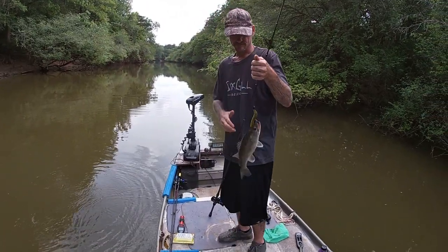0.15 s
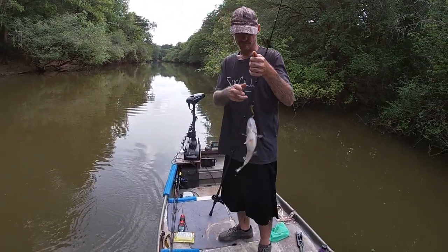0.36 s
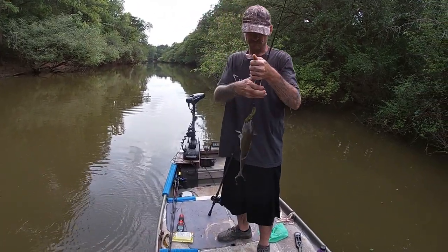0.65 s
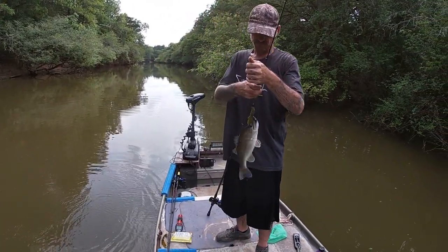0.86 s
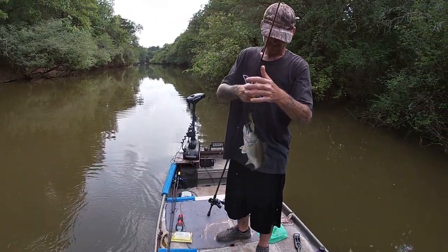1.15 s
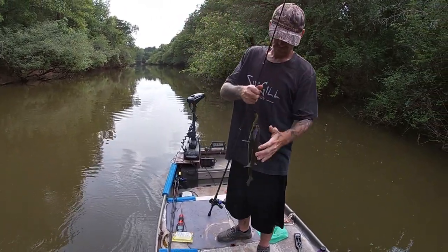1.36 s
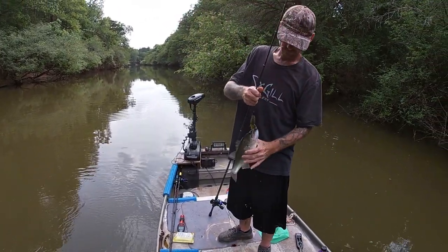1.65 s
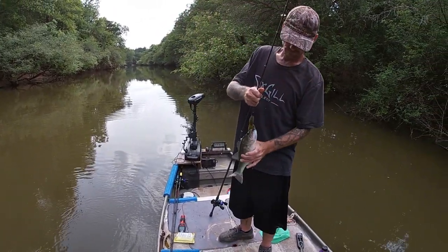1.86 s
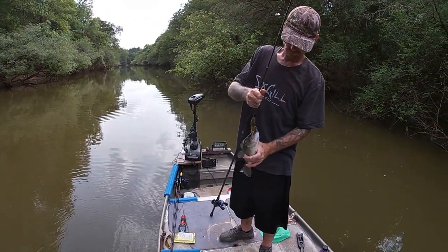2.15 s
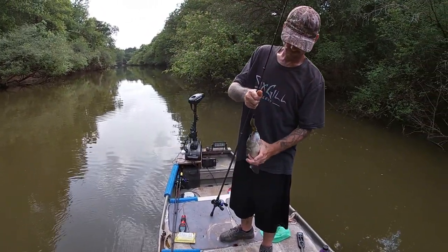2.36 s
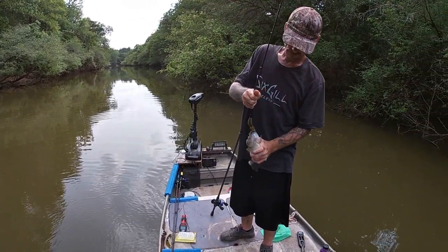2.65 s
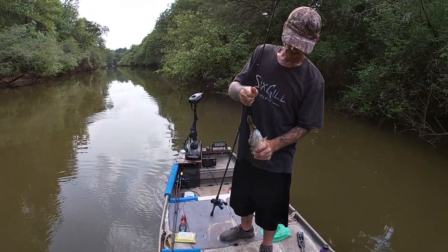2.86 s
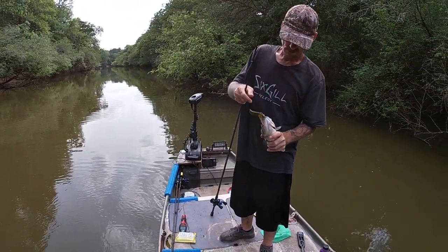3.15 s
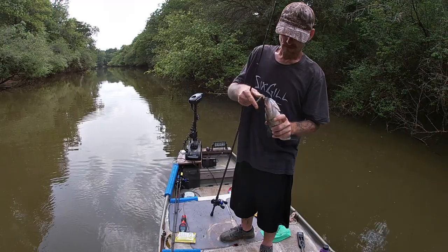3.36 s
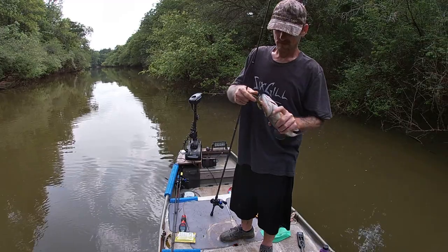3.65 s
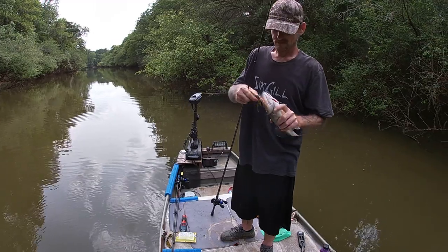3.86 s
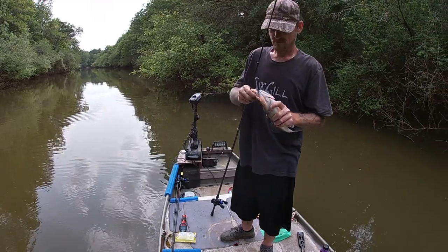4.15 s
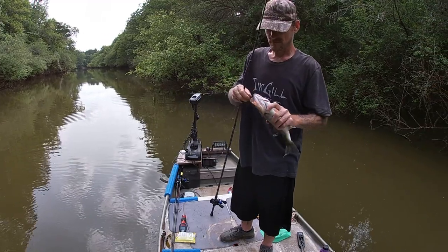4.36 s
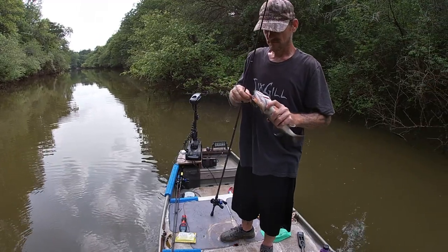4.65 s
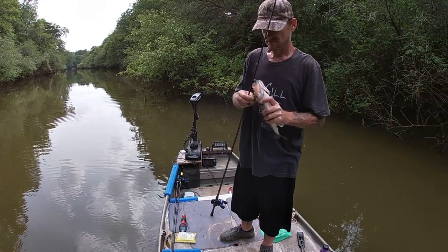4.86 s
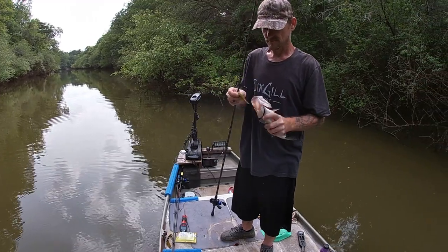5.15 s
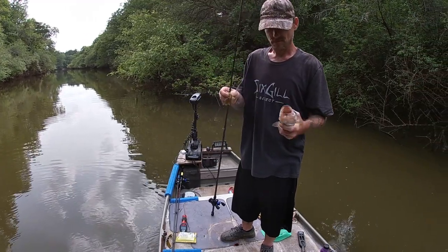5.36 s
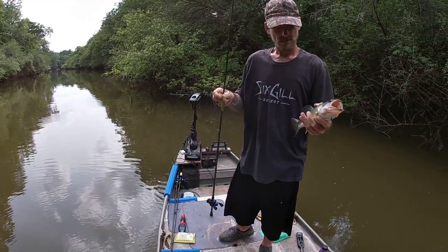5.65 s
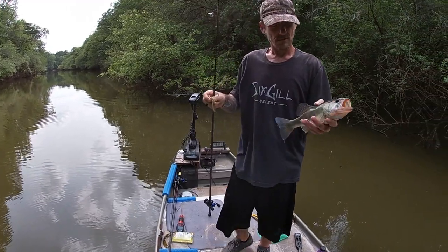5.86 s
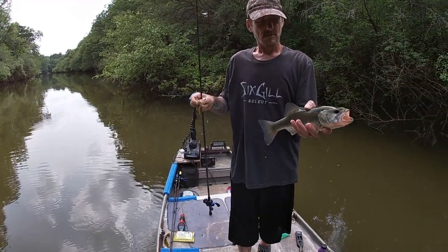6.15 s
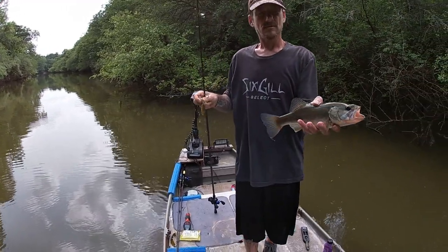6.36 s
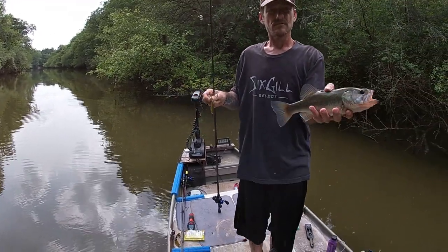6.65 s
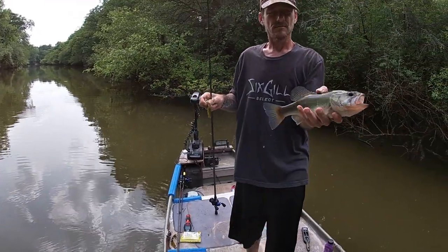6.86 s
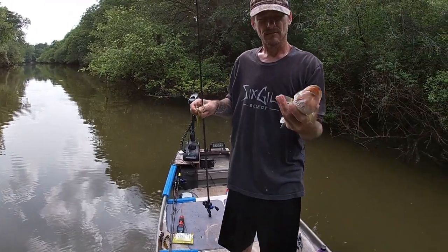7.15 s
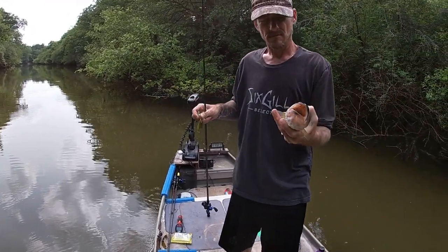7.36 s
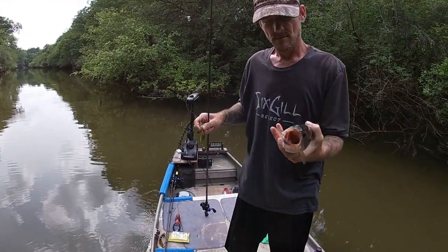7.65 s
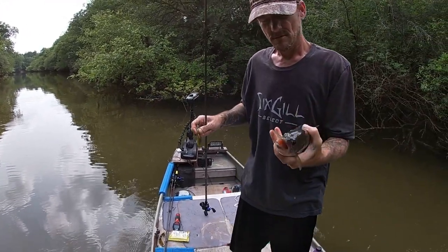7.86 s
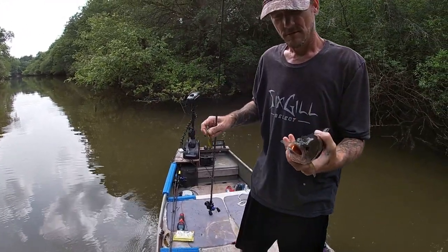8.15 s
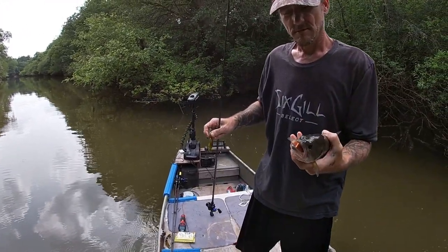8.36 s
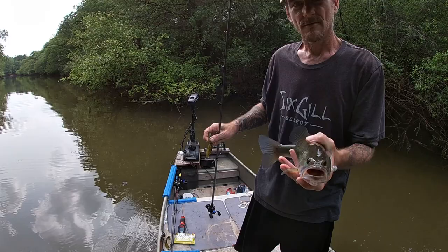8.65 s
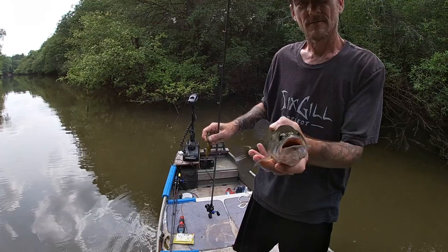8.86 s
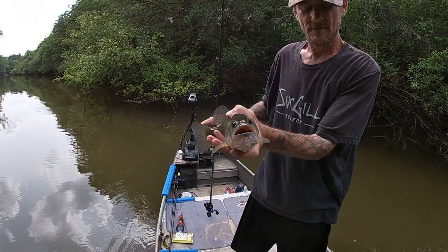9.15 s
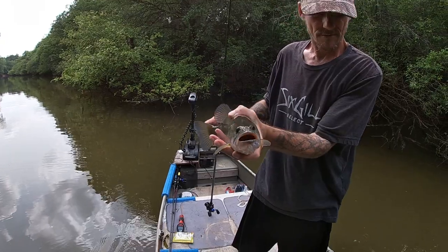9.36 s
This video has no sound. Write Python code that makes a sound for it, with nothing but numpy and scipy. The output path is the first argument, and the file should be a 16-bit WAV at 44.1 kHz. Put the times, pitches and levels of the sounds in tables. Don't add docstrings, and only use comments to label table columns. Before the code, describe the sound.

Outdoors on a small metal boat, the microphone catches handling sounds close by under constant shrill cicadas. A burst of hollow thuds and clinks comes first, then a bright, bird-like fluttering whistle echoing in the trees. After a calmer spell, small metallic clinks and line snaps cluster, followed by knocks and booming footfalls on the hull. Faint distant bird whistles, low water murmur and light wind puffs continue around them.

```python
import sys
import numpy as np
from scipy import signal
from scipy.fft import rfft, irfft
from scipy.io import wavfile
from scipy.ndimage import uniform_filter1d

SR = 44100
rng = np.random.default_rng(int(sys.argv[2]) if len(sys.argv) > 2 else 0)


def linear_from_db(decibels):
    return 10 ** (np.asarray(decibels, float) / 20)


def dump_mix(stems):
    frames = np.atleast_2d(stems).T
    limited = np.clip(frames, -1, 1)
    pcm = np.round(limited * 32767).astype(np.int16)
    wavfile.write(sys.argv[1], SR, pcm)


N = 419832


def in_time(rows):
    s, *columns = np.transpose(rows)
    return [np.interp(np.arange(N) / SR, s, column) for column in columns]


def rms_one(x):
    return x / np.sqrt(np.mean(x ** 2) + 1e-20)


def noise():
    return rng.standard_normal(N)


def band(x, low_hz, high_hz):
    return signal.sosfilt(signal.butter(2, [low_hz, high_hz], "band", fs=SR, output="sos"), x)


def colour(x, points):
    hz, db = np.transpose(points)
    log_hz = np.log(np.arange(N // 2 + 1) * SR / N + 1)
    gain_db = np.interp(log_hz, np.log(hz), db, left=-90, right=-90)
    return rms_one(irfft(rfft(x) * linear_from_db(gain_db), N))


def drift(rate_hz):
    r = np.exp(-80 * np.pi * rate_hz / SR)
    slow = signal.lfilter([1], [1, -2 * r, r * r], rng.standard_normal(N // 40 + 2002))[2000:]
    return np.interp(np.arange(N) / 40, np.arange(len(slow)), rms_one(slow))


def ring(push, hz, t60_s):
    r, w = linear_from_db(-60 / (t60_s * SR)), 2 * np.pi * hz / SR
    return signal.lfilter([0, np.sin(w)], [1, -2 * r * np.cos(w), r * r], push + 1e-18)


def add(out, s, sound):
    at = round(s * SR)
    out[at:at + len(sound)] += sound[:N - at]


def woods(x, t60_s):
    t = np.arange(SR) / SR
    tail = rng.standard_normal(SR) * linear_from_db(-60 * t / t60_s)
    tail *= 1 - np.exp(-t / 0.0073)
    return signal.fftconvolve(x, tail / np.sqrt(np.sum(tail ** 2)))[:N]


def hush():
    # pitch_hz, level_db (per Hz)
    hush_points = [(300, -36), (560, -5), (800, 3.5), (1000, -4), (1400, -1), (2000, -6), (2800, -22),
                   (4000, -32)]
    steady = colour(noise(), hush_points)
    low = signal.sosfiltfilt(signal.butter(2, 1200, fs=SR, output="sos"), steady)
    high = steady - low
    return linear_from_db(-74) * (low * linear_from_db(1.7 * drift(4.5)) + high * linear_from_db(2.1 * drift(2.7)))


def murmur():
    # time_s, level_db
    stir_curve = [(0, -63.5), (.4, -64), (.53, -44.5), (.74, -68), (1.14, -63), (1.4, -64.5), (3.9, -64.5),
                  (4.5, -65.5), (4.98, -64.5), (5.43, -65), (6.0, -59), (6.31, -54), (6.5, -63),
                  (7.21, -60.5), (7.82, -60), (8.6, -63.5), (8.83, -59.5), (9.52, -62.5)]
    # pitch_hz, level_db (per Hz)
    murmur_points = [(70, -7), (100, -8.5), (180, 3), (220, -2.5), (290, -10.5), (420, -13), (600, -22),
                     (1000, -25.5)]
    level_db, = in_time(stir_curve)
    return colour(noise() * linear_from_db(1.97 * drift(17.5)), murmur_points) * linear_from_db(level_db)


def wind():
    # peak_s, length_s, level_db
    puffs = [(0, 0.43, -58.5), (0.29, 0.31, -56.5), (0.772, 0.56, -53.5), (1.07, 0.35, -56.5),
             (1.593, 0.73, -61), (2.48, 1, -61), (3.183, 0.61, -58), (3.595, 0.87, -68), (4.11, 0.99, -63),
             (6.286, 0.18, -50), (6.722, 0.34, -52), (6.94, 0.29, -63), (7.393, 0.73, -49.5),
             (7.848, 0.43, -65), (8.32, 0.6, -64), (8.8, 0.35, -60), (9.177, 0.48, -62),
             (9.52, 0.35, -52.5)]
    # pitch_hz, level_db (per Hz)
    wind_points = [(18, -20), (32, 0.5), (50, -2), (70, -3.5), (100, -11.5), (160, -9), (300, -31)]
    t = np.arange(N) / SR
    strength = linear_from_db(-73.5) * np.ones(N)
    for peak_s, length_s, db in puffs:
        strength += linear_from_db(db) * np.exp(-(3 * (t - peak_s) / length_s) ** 2)
    return colour(noise(), wind_points) * strength * linear_from_db(1.5 * drift(6))


def far_song():
    # peak_s, level_db
    song_peaks = [(0, -68), (1.62, -60), (2.46, -66.5), (3.23, -62), (4.6, -57.5), (6.23, -72), (7.98, -59),
                  (8.52, -77), (8.75, -64)]
    rise_db_per_s, fall_db_per_s = 65, 36
    whistles, t = np.zeros(N), np.arange(SR // 25) / SR
    for s, pitch, glide in rng.random((1800, 3)):
        hz = 2500 + 800 * pitch + 40000 * (glide - .5) * (t - .02)
        add(whistles, s * N / SR, np.sin(2 * np.pi * np.cumsum(hz) / SR) * np.hanning(len(t)))
    time = np.arange(N) / SR
    strength = linear_from_db(-81) * np.ones(N)
    for peak_s, db in song_peaks:
        slope = np.where(time < peak_s, rise_db_per_s, fall_db_per_s)
        strength += linear_from_db(db - slope * abs(time - peak_s))
    return rms_one(woods(whistles, 0.42)) * strength * linear_from_db(-3.0)


def whistle(notes, second_db, third_db):
    out = np.zeros(N)
    for note in notes:
        s, hz, db = np.transpose(note)
        t = np.arange(s[0], s[-1], 1 / SR)
        glide_hz = uniform_filter1d(np.interp(t, s, hz), size=130)
        turn = 2 * np.pi * np.cumsum(glide_hz) / SR
        level_db = np.interp(t, s, db)
        overtone_gain = linear_from_db(.6 * (level_db + 32))
        overtones = linear_from_db(second_db) * np.sin(2 * turn) + linear_from_db(third_db) * np.sin(3 * turn)
        tone = np.sqrt(2) * (np.sin(turn) + overtone_gain * overtones)
        add(out, s[0], tone * linear_from_db(level_db) * signal.windows.tukey(len(t), .1))
    return out


def far_birds():
    # start_s, length_s, from_hz, to_hz, level_db
    far_calls = [(1.453, .055, 2480, 2340, -66), (1.523, 0.044, 2660, 2740, -62),
                 (1.566, .034, 2750, 3130, -53.5), (1.59, .025, 3080, 3550, -55),
                 (1.74, 0.033, 3150, 3250, -58), (1.704, 0.028, 3240, 3250, -53),
                 (2.8, .1, 2610, 2560, -67), (2.947, 0.18, 2550, 2540, -70), (2.887, .07, 2380, 2340, -72),
                 (3.223, .1, 2620, 2560, -68), (3.28, .14, 2334, 2320, -74), (3.8, .12, 2600, 2690, -72),
                 (6.295, 0.079, 2600, 2600, -70), (6.71, 0.076, 2630, 2610, -70),
                 (4.448, 0.037, 2760, 2220, -60), (4.476, 0.02, 2280, 2620, -58),
                 (4.495, 0.036, 2620, 2300, -59), (4.553, .02, 3230, 2780, -53),
                 (4.57, .04, 2800, 2800, -61), (4.575, 0.11, 2500, 2330, -61.5),
                 (4.67, 0.067, 2200, 1930, -68), (7.787, 0.029, 3190, 2800, -50.5),
                 (7.817, 0.037, 2910, 3180, -51), (7.847, .025, 2830, 2350, -58),
                 (7.946, 0.16, 2610, 2720, -67), (8.315, .05, 770, 740, -63), (8.387, .06, 724, 720, -68),
                 (8.0, 0.044, 1280, 1250, -70), (8.491, .04, 2860, 2710, -65),
                 (8.673, 0.031, 2870, 2720, -58), (8.713, 0.034, 2820, 2370, -61)]
    shape = (0, -8), (.18, 0), (.65, 0), (1, -14)
    notes = []
    for s, length_s, from_hz, to_hz, db in far_calls:
        notes.append([(s + k * length_s, from_hz + k * (to_hz - from_hz), db + g) for k, g in shape])
    far = whistle(notes, -42, -50)
    return .6 * far * linear_from_db(2 * drift(50) + 3 * drift(150)) + linear_from_db(-10) * woods(far, .4)


def far_dove():
    # time_s, pitch_hz, level_db
    coo_notes = [
        [(8.815, 735, -80), (8.84, 740, -68), (8.9, 708, -66.5), (9.0, 702, -63), (9.04, 734, -68),
         (9.09, 715, -80)],
    ]
    return whistle(coo_notes, -40, -60) * linear_from_db(1.5 * drift(30))


def near_bird():
    # time_s, pitch_hz, level_db
    phrase = [
        [(2.275, 2003, -82), (2.29, 2720, -48), (2.299, 3850, -39), (2.315, 4550, -36), (2.328, 4780, -33.5),
         (2.342, 4400, -34), (2.355, 3200, -38.5), (2.364, 2880, -44)],
        [(2.361, 2900, -43), (2.372, 3710, -34), (2.379, 5050, -37), (2.385, 4600, -39), (2.39, 4020, -37),
         (2.396, 3950, -60)],
        [(2.443, 2600, -62), (2.447, 2900, -50), (2.451, 3600, -52), (2.456, 4600, -60)],
        [(2.452, 4820, -55), (2.465, 5120, -39), (2.48, 5256, -27.5), (2.498, 5276, -31.5), (2.51, 5130, -55)],
        [(2.487, 5280, -50), (2.495, 5400, -35), (2.503, 5750, -33), (2.507, 5900, -60)],
        [(2.546, 5050, -64), (2.55, 4310, -32.5), (2.555, 2834, -42.5), (2.562, 2330, -46.5),
         (2.574, 1500, -65)],
    ]
    near = whistle(phrase, -36, -30) * linear_from_db(1.5 * drift(90))
    return near + linear_from_db(-7) * woods(near, .8) + linear_from_db(-25) * np.roll(near, round(0.022 * SR))


def rubs():
    # start_s, end_s, level_db
    strokes = [
        (4.505, 4.59, -70),
        (4.838, 5.12, -64),
        (5.35, 5.814, -72),
        (7.84, 8.004, -64),
    ]
    grains = rms_one(band(noise() * linear_from_db(2.5 * drift(60)), 900, 2600))
    strength = np.zeros(N)
    for start_s, end_s, db in strokes:
        add(strength, start_s, linear_from_db(db) * np.hanning(round((end_s - start_s) * SR)))
    return grains * strength


def snaps():
    # start_s, peak_db
    snap_times = [(0.6136, -52), (2.582, -63), (4.9119, -66), (4.9571, -68), (4.9875, -62), (5.0025, -53),
                  (5.914, -65), (7.8775, -70)]
    out, t = np.zeros(N), np.arange(1500) / SR
    for s, db in snap_times:
        crack = rng.standard_normal(len(t)) * linear_from_db(-60 * t / .02)
        add(out, s, linear_from_db(db + 5.5) * signal.lfilter([1, 0, -.8], [1, -.2], crack))
    return out


def tick(hz, dull_db, bright_db):
    t = np.arange(3000) / SR
    scratch = rng.standard_normal(len(t)) * linear_from_db(-60 * t / 0.028)
    scratch[0] = 4.0
    tone = ring(scratch, hz, t60_s=.0155)
    dull, bright = band(scratch, 400, 1300), band(scratch, 1300, 3300)
    sound = np.zeros(len(t))
    for part, db in (tone, 0), (dull, dull_db), (bright, bright_db):
        sound += linear_from_db(db) * part / np.abs(part).max()
    return sound


def tackle():
    # start_s, peak_db, pitch_hz, bright_click_db
    knocks = [(0.445, -52, 770, -5), (0.504, -37, 708, -2), (1.069, -41.5, 746, -4), (1.278, -42, 620, 3),
              (1.695, -46, 660, -25), (2.038, -43, 815, -23), (4.792, -50, 760, -15), (5.759, -46, 870, 8),
              (5.913, -44, 940, 9), (6.027, -42.5, 1010, 6), (6.155, -40, 930, 6), (6.191, -35, 640, 0),
              (6.404, -42, 714, -21), (6.477, -39, 630, 0), (6.812, -46, 915, -19),
              (6.936, -41.5, 624, -11), (7.14, -41.5, 730, 3), (7.267, -36, 780, -2), (7.4, -43.5, 694, 4),
              (7.588, -38.5, 630, 2.5), (8.303, -47.5, 895, 10), (8.961, -49, 1000, 9),
              (0.561, -51, 1000, 3), (1.018, -52, 900, -5), (1.086, -53, 650, -10), (1.29, -49, 600, -12),
              (4.8, -50, 900, 7), (6.166, -46, 805, 6), (6.655, -50, 1310, -10), (6.714, -51, 900, -10)]
    # start_s, peak_db, pitch_hz, dull_click_db
    clinks = [(0.337, -44, 1730, -17), (0.506, -37, 1740, -10), (0.53, -43, 1500, -1),
              (0.607, -49, 1410, -8), (1.126, -53, 1220, 6), (1.38, -50, 1450, 0), (2.111, -55, 1330, 2),
              (3.856, -52, 1880, -11), (3.988, -44.5, 1920, -20), (4.34, -40.5, 1770, -7),
              (4.373, -37.5, 1770, -19), (4.489, -40, 1940, -23), (4.513, -33.5, 2000, -41),
              (4.877, -41, 1860, -14), (4.911, -36.5, 2030, -24), (4.947, -42, 1720, -8),
              (4.956, -36, 1860, -11), (4.968, -41, 1740, -13), (4.989, -61, 1490, -5),
              (5.056, -41, 1750, -15), (5.064, -41, 1820, -13), (5.076, -44.5, 1700, 1),
              (7.177, -47, 1500, -1), (7.925, -46, 1550, -6), (0.617, -46, 1390, -11),
              (2.582, -45, 1500, -10), (4.757, -43, 2200, -11), (6.2, -46, 1850, -15)]
    out = np.zeros(N)
    for s, db, hz, bright_db in knocks:
        add(out, s, linear_from_db(db - 10.5) * tick(hz, 2.5, bright_db))
    for s, db, hz, dull_db in clinks:
        add(out, s, linear_from_db(db - 10.5) * tick(hz, dull_db, -12))
    return out + linear_from_db(-13) * woods(out, .12)


def thuds():
    # start_s, peak_db, plate_hz, t60_s
    footfalls = [(0.472, -36.5, 72.7, 0.19), (0.499, -23.5, 120, 0.062), (0.509, -30, 96.4, 0.22),
                 (0.511, -31.5, 298, 0.088), (0.541, -31.5, 73, 0.1), (1.026, -51, 175, 0.15),
                 (1.035, -48, 295, 0.17), (1.082, -48, 111, .08), (1.12, -48, 200, 0.11),
                 (1.2, -52, 216, .08), (1.279, -48, 189.3, 0.22), (1.289, -51, 404, 0.073),
                 (3.826, -55, 179, 0.12), (5.76, -47, 228, 0.1), (5.915, -43, 193, 0.31),
                 (6.021, -48.5, 190, 0.43), (6.157, -27.5, 70.3, 0.17), (6.194, -35, 122, 0.093),
                 (6.223, -42, 65, 0.19), (6.411, -47, 476, 0.079), (6.479, -46, 70, 0.033),
                 (6.642, -46, 207, 0.2), (6.657, -39, 492, 0.11), (6.719, -48.5, 448, 0.055),
                 (7.175, -42, 217, 0.18), (7.261, -24.5, 162, 0.07), (7.284, -28, 188, 0.073),
                 (7.516, -44, 416, 0.087), (7.52, -36, 143, 0.079), (8.297, -50, 204, 0.12),
                 (8.699, -36, 190, .05), (8.71, -34, 148.7, 0.23), (6.245, -44.5, 238, 0.17)]
    # pitch_hz, level_db, t60_s
    hull_modes = [(40, -7, 0.52), (76.2, -1.5, 0.28), (143, -12, 0.52), (178, 0, 0.13), (230, 4, 0.12),
                  (328, -2, 0.17), (476, -19, 0.088), (740, -36, .06)]
    out, t = np.zeros(N), np.arange(SR // 2) / SR
    for s, db, hz, t60_s in footfalls:
        push = np.zeros(len(t))
        contact = np.hanning(max(int(.45 * SR / hz), 8))
        push[:len(contact)] = contact / contact.sum()
        sound = ring(push, hz, t60_s + 0.01)
        for mode_hz, mode_db, mode_t60_s in hull_modes:
            share_db = mode_db - 10.5 + rng.normal(0, 3.5)
            sound += linear_from_db(share_db) * ring(push, mode_hz, mode_t60_s)
        sound *= np.exp(-t * hz / 0.5) - 1
        grit = rng.standard_normal(len(t)) ** 3 * linear_from_db(-60 * t / 0.29)
        rattle_db = -67 + 0.065 * (db + 53.0)
        rattle = linear_from_db(rattle_db) * band(grit, 250, 1100)
        add(out, s, linear_from_db(db) * sound / np.abs(sound).max() + rattle)
    return out


def click_train(per_s):
    count = np.floor(np.cumsum(per_s / SR) + rng.random())
    return np.diff(count, prepend=0.).clip(0, 1)


def singers(body, level_db, flicker_db, count=24):
    clicks, waver = np.zeros(N), drift(30)
    for k in range(count):
        per_s = rng.uniform(140, 330) * (1 + .08 * np.roll(waver, k * N // count))
        clicks += click_train(per_s) * linear_from_db(rng.normal(0, 1.8)) * (-1) ** k
    clicks *= 1 + .5 * noise()
    heard = .5 * rms_one(clicks) + noise()
    return colour(heard, body) * linear_from_db(level_db + flicker_db * (drift(34) + 1.7 * drift(19)))


def chorus():
    # time_s, level_db
    swell_curve = [(0, -43.5), (1.1, -44), (1.75, -41.5), (2.46, -39), (3.15, -41.5), (3.5, -43.5),
                   (4.56, -43.5), (5.67, -45), (6.18, -43.5), (6.5, -44), (7.16, -41), (8.6, -41),
                   (8.93, -40), (9.23, -42), (9.52, -41)]
    # pitch_hz, level_db (per Hz)
    high_body = [(3000, -36), (4300, -12), (5300, 0.5), (5750, 1), (6500, -7.5), (7100, -15.5), (8300, -24),
                 (9400, -24), (10300, -33), (11000, -39.5), (12800, -45), (14300, -46), (15000, -43),
                 (16000, -80)]
    # pitch_hz, level_db (per Hz)
    low_body = [(1500, -39), (2200, -22.5), (2800, -19.5), (3300, -8), (3800, 1), (4400, 0), (5000, -24),
                (6500, -32)]
    high_db, = in_time(swell_curve)
    late_swell = np.roll(high_db - high_db.mean(), round(.1 * SR))
    low_db = -53 + 0.7 * late_swell
    return singers(high_body, high_db, flicker_db=0.0) + singers(low_body, low_db, flicker_db=0.26)


def near_cicada():
    # time_s, level_db, unevenness (0-1), strong-weak beat (0-1)
    buzz_curve = [(0, -59.5, 0.7, 1), (.6, -60, 0.8, 1), (.9, -61, 0.6, 0), (2.1, -62, 0.3, 0),
                  (2.5, -63.5, .7, 0.3), (3.2, -63, 0.65, 0.16), (4.1, -60.5, 0.2, 0), (4.4, -62, 0.8, .8),
                  (5.3, -60.5, 0.83, 1), (6.2, -63, 0.9, 0.9), (6.9, -64.5, 0.7, 0.3), (7.4, -75, .6, 0.4),
                  (9.52, -93.5, .8, 0.5)]
    # pitch_hz, width_hz, level_db
    body_rings = [(9630, 760, 6), (14300, 970, -13)]
    level_db, uneven, beat = in_time(buzz_curve)
    uneven = uneven.clip(0, 1)
    clicks_per_s = 319.8 - .3 * np.arange(N) / SR
    turn = 2 * np.pi * np.cumsum(clicks_per_s * (1 + .002 * drift(12))) / SR
    fading = linear_from_db(3 * drift(6))
    even = np.zeros(N)
    for k in [*range(27, 34), *range(42, 47)]:
        even += np.roll(fading, k * SR) * np.cos(k * turn)
    even = rms_one(even) * (1 - beat / 2 + beat * np.cos(turn / 2))
    drive = .48 * np.sqrt(1 - uneven) * even + np.sqrt(uneven) * noise()
    body = np.zeros(N)
    for hz, width_hz, db in body_rings:
        body += linear_from_db(db) * band(drive, hz - width_hz / 2, hz + width_hz / 2)
    return rms_one(body) * linear_from_db(level_db + 0.67 * drift(15))


def scene():
    air = hush() + murmur() + wind()
    birds = far_song() + far_birds() + far_dove() + near_bird()
    boat = rubs() + snaps() + tackle() + thuds()
    insects = chorus() + near_cicada()
    return (air + birds + boat + insects)[None]


def low_pass(x):
    return signal.sosfilt(signal.butter(12, 15900, fs=SR, output="sos"), x)


def record(dry):
    heard = signal.sosfilt(signal.butter(2, 30, "high", fs=SR, output="sos"), dry)
    heard = signal.sosfilt(signal.cheby2(12, 38, 15000, fs=SR, output="sos"), heard)
    return low_pass(heard)


dry = scene()
out = record(dry)
dump_mix(out)
```